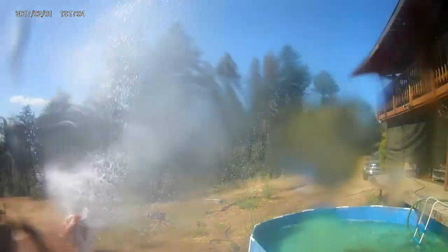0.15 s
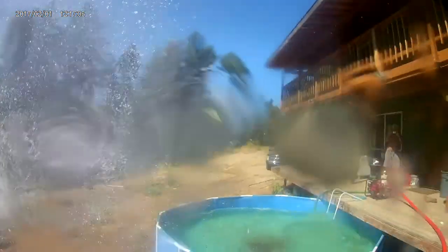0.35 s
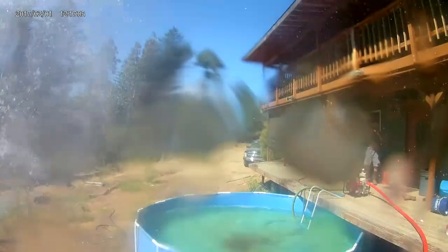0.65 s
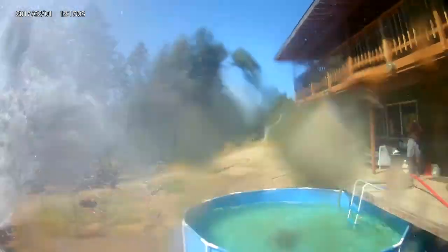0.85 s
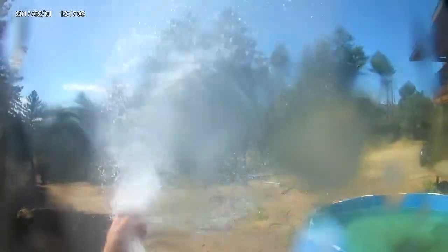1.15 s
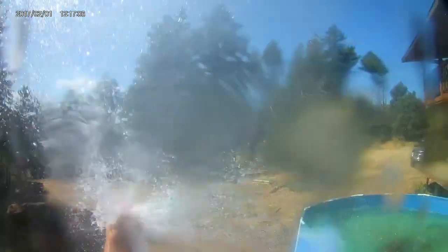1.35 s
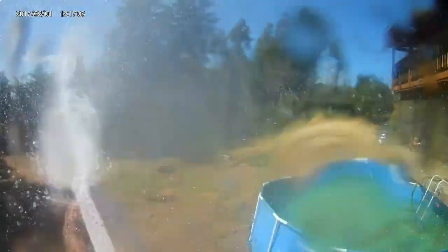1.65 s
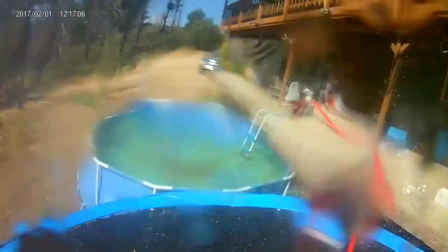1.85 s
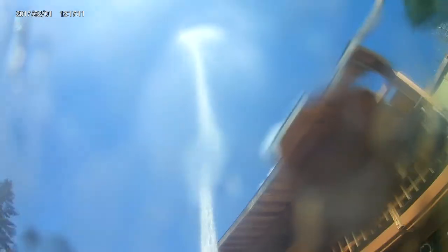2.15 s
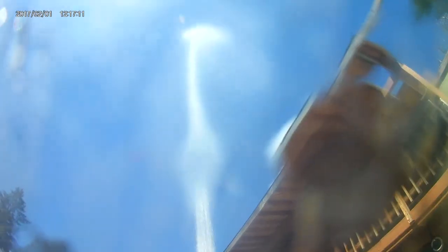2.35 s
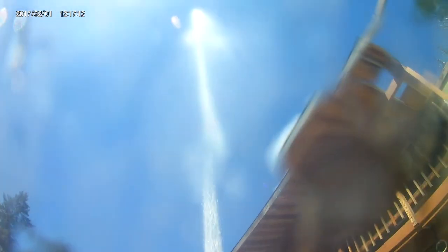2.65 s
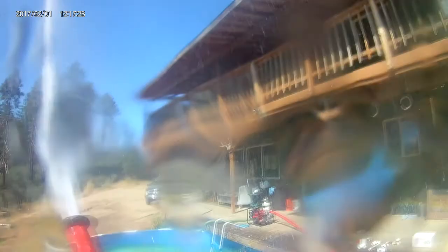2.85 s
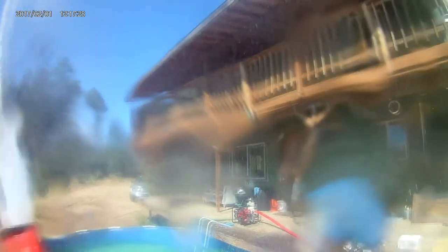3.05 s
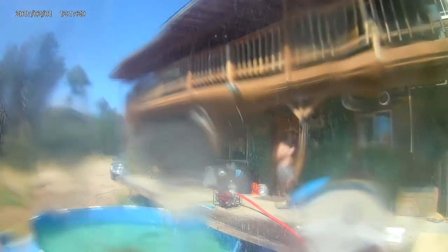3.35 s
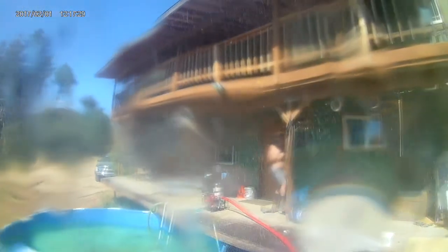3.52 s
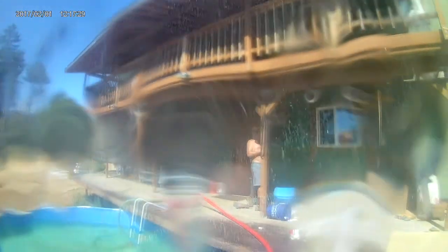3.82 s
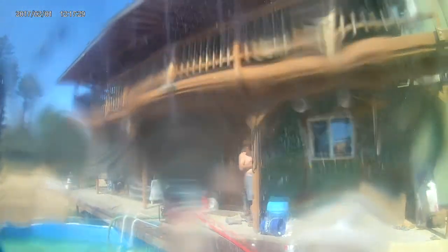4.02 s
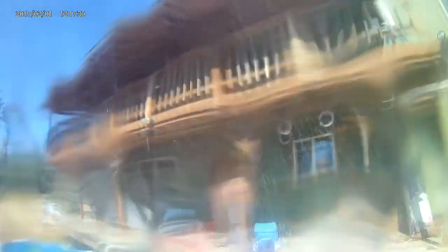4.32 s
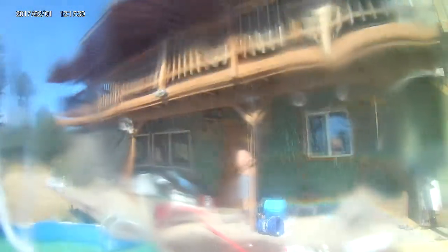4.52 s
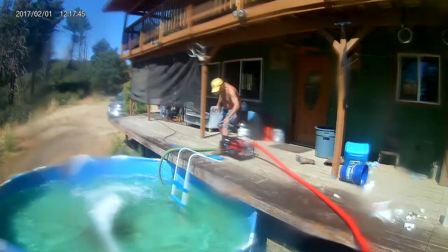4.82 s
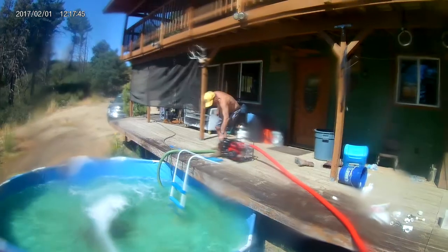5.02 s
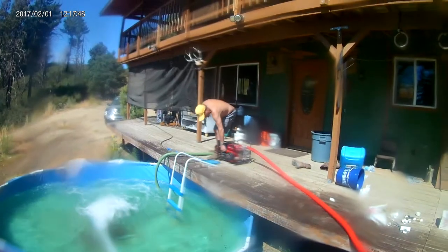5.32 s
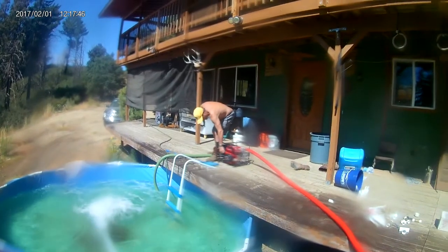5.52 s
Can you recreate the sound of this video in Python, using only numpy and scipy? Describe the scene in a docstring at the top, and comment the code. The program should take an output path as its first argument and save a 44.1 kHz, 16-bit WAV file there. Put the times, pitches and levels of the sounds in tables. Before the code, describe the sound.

A wearable-type microphone in a hard casing catches close hose spray over a constant pump engine across the yard. The hiss flares and spatters, then drops through abrupt cuts with low wind rumble. Falling water then pelts the casing with dense, hollow knocks and clicks, far louder than everything else. The last cut leaves a rattling engine and a jet churning the pool.

```python
"""Pump and hose in a yard

A small petrol pump drones steadily across the yard: harmonics of its firing cycle, and knocks that ring.
Near the microphone a hose jet, made of flickering coloured noise, hisses, narrows and falls back as heavy drops.
They drum on the hard shell carrying the microphone, a set of struck modes; then the jet plunges into a pool.
Wind rumbles lumpily underneath. The listening place changes abruptly four times."""
import sys
import numpy as np
from scipy import signal
from scipy.fft import rfft, irfft, next_fast_len
from scipy.io import wavfile

SR = 44100
rng = np.random.default_rng(int(sys.argv[2]) if len(sys.argv) > 2 else 0)


def wav_out(sig):
    """Save sig, one row per channel (or a flat mono array), as 16-bit PCM at SR to the path in sys.argv[1]."""
    wavfile.write(sys.argv[1], SR, np.round(np.clip(np.atleast_2d(sig).T, -1, 1) * 32767).astype(np.int16))


N = 250488


def from_db(db):
    """Gain of a level in dB."""
    return 10 ** (np.asarray(db) / 20)


def rms_one(x):
    """Scale to rms 1."""
    return x / np.sqrt(np.mean(x ** 2) + 1e-20)


def in_time(rows, outside=None):
    """Columns of a table joined by straight lines, one value a sample; the first column is t/s."""
    t, *columns = np.transpose(rows)
    return [np.interp(np.arange(N) / SR, t, column, outside, outside) for column in columns]


def drift(rate_hz):
    """Slow chance: noise through a double one-pole low-pass; spread 1."""
    r = np.exp(-2 * np.pi * rate_hz / SR)
    noise = rng.standard_normal(N + SR)     # the first second lets the filter settle
    return rms_one(signal.lfilter([1], [1, -2 * r, r * r], noise)[SR:])


def band_pass(x, order, edges_hz):
    """Keep the range between two frequencies."""
    return signal.sosfilt(signal.butter(order, edges_hz, "band", fs=SR, output="sos"), x)


def coloured(x, spectrum):
    """Give a white signal a spectrum, straight in dB over log frequency; rms 1."""
    size = next_fast_len(N)
    hz, level_db = np.transpose(spectrum)
    log_hz = np.log(np.arange(1, size // 2 + 2) * SR / size)
    gain = from_db(np.interp(log_hz, np.log(hz), level_db, -80, -80))
    return rms_one(irfft(rfft(x, size) * gain, size)[:N])


def ring(clicks, hz, t60):
    """A unit click sets a sine of starting height 1 ringing; it falls 60 dB in t60 seconds."""
    r, w = from_db(-60 / (t60 * SR)), 2 * np.pi * hz / SR
    return signal.lfilter([0, np.sin(w)], [1, -2 * r * np.cos(w), r * r], clicks + 1e-18)


# When the listening place changes: t/s
CHANGES_S = [1.72, 2.11, 2.88, 4.846]
# The five listening places, one a row: engine gain level/dB, rush level/dB, fine hiss level/dB,
# wind rumble level/dB, share of the poolside [0-1]
PLACES = [(4, -43.5, -47.5, -54, 0.17), (4, -50, -57, -47, 0.54), (3, -57.5, -59, -62, 0.32),
          (5, -39, -50.5, -56.5, 0.8), (3.5, -54, -107, -63, 0.98)]
CHANGE_S = .012     # length of each change


def places():
    """Columns of the places table, each gliding quickly to the next row at a change."""
    t = np.repeat(CHANGES_S, 2) + np.tile([-CHANGE_S / 2, CHANGE_S / 2], len(CHANGES_S))
    return in_time(np.column_stack([t, np.repeat(PLACES, 2, axis=0)[1:-1]]))


# Multiples 1, 2, 3 .. of the firing cycle, before the place's gain and the drift:
# peak level/dB in the yard, peak level/dB at the poolside
ORDERS = [(-74, -65), (-70, -64), (-86, -74), (-76, -70), (-66, -62), (-69, -59), (-68, -62), (-62, -68),
          (-66, -63), (-63, -59), (-76, -63), (-87, -61), (-65, -60), (-73, -63), (-75, -64), (-61, -57),
          (-61, -59), (-67, -65), (-72, -67), (-61, -62), (-64, -69), (-80, -67), (-73, -63), (-66, -62)]


def engine_orders(turns, pool):
    """Sines at multiples of the firing cycle, each wavering in level on its own."""
    lines = 0
    for k, (yard_db, pool_db) in enumerate(ORDERS, start=1):
        lag = rng.random()      # echoes off the yard scatter the orders over the cycle
        level_db = yard_db + pool ** 8 * (pool_db - yard_db) + 2.0 * drift(4.7)
        lines = lines + from_db(level_db) * np.cos(2 * np.pi * (k * turns - lag))
    return lines


# Upper engine resonances: f/Hz, width f/Hz, relative level/dB
CLATTER = [(1080, 320, -5), (1255, 67, -7.5)]


def engine_clatter(turns):
    """One knock a cycle, smeared by echoes off walls and deck, rings in the upper resonances; rms 1."""
    knocks = np.diff(np.floor(turns), prepend=0) * from_db(3.0 * drift(37))
    after_s = np.arange(0, .12, 1 / SR)
    echoes = rng.standard_normal(len(after_s)) * np.exp(-after_s / .05)
    knocks = signal.fftconvolve(knocks, echoes)[:N]
    clatter = 0
    for hz, width_hz, level_db in CLATTER:
        clatter = clatter + from_db(level_db) * ring(knocks, hz, np.log(1000) / (np.pi * width_hz))
    return rms_one(clatter)


CYCLES_PER_S = 31.51    # mean firing rate


def engine():
    """The pump across the yard: firing orders and clatter share one almost steady rotation."""
    gain_db, *_, pool = places()
    turns = np.cumsum(CYCLES_PER_S * (1 + .0006 * drift(2.5))) / SR
    clatter_gain = from_db(-55.0 + 5.9 * pool)
    return from_db(gain_db) * (engine_orders(turns, pool) + clatter_gain * engine_clatter(turns))


def patchy(x, edges_hz, patchy_db):
    """Let ranges of a noise swell and sink on their own as the fan of water changes shape."""
    out = x
    for pair in zip(edges_hz, edges_hz[1:]):
        out = out + (from_db(patchy_db * drift(2.8)) - 1) * band_pass(x, 2, pair)
    return out


# Lower jet noise: f/Hz, relative level/dB per Hz
RUSH = [(120, -46), (400, -18), (1050, -12.5), (1290, -3), (1500, -4.5), (1900, -15), (2350, -8.5),
        (2750, -24.5)]
# Upper jet noise: f/Hz, relative level/dB per Hz
HISS = [(2700, -22), (3550, 2), (4000, -6.5), (4290, -4.5), (4900, -20), (5270, -9.5), (5600, -20),
        (6950, -14), (8500, -26.5), (9500, -22), (12300, -27)]


def jet(rush_db, hiss_db):
    """Hose spray near the microphone: jet noise in two ranges that flicker partly together."""
    together = drift(25)
    rush = coloured(rng.standard_normal(N) * from_db(together + drift(140)), RUSH)
    hiss = coloured(rng.standard_normal(N) * from_db(together + 0.23 * drift(100)), HISS)
    rush = patchy(rush, [1100, 1900, 2600], 2.0)
    hiss = patchy(hiss, [3000, 4000, 7000, 11500], 1.5)
    return from_db(rush_db) * rush + from_db(hiss_db) * hiss


# The jet plunging into the pool: f/Hz, relative level/dB per Hz
PLUNGE = [(100, -35), (700, -11.5), (1000, -24), (1280, 4), (1420, -19), (1800, -5.5), (2000, -22),
          (2750, -28), (3250, -2.5), (3550, -14.5), (7500, -28.5), (12300, -36.5)]
PLUNGE_DB = -46     # at full share of the poolside


def plunge(pool):
    """Flickering coloured noise of the jet entering the pool, stronger towards the poolside."""
    return from_db(PLUNGE_DB) * pool * coloured(rng.standard_normal(N) * from_db(drift(68)), PLUNGE)


# Wind at the microphone: f/Hz, relative level/dB per Hz
RUMBLE = [(15, 6), (70, 6.5), (100, -12), (160, 6.5), (300, -24)]


def wind(rumble_db):
    """Low coloured noise whose level wanders in lumps."""
    return from_db(rumble_db) * coloured(rng.standard_normal(N) * from_db(2.5 * drift(10)), RUMBLE)


# The fan of water swings towards the listener in the first place; added gains:
# t/s, rush level/dB, hiss level/dB, rumble level/dB
FAN = [(0, -1.5, 5, 5), (.25, 2, 5, 0), (.9, 0, 4, 0), (1.03, 0, 9, -1.5), (1.45, 6, 7.5, 1),
       (1.58, 4, 7, 7), (1.71, 0, 3.5, 10)]


def water():
    """Jet, plunge and wind rumble, at the levels of each place and of the swinging fan."""
    _, *levels_db, pool = places()
    rush_db, hiss_db, rumble_db = np.add(levels_db, in_time(FAN, outside=0))
    return jet(rush_db, hiss_db) + plunge(pool) + wind(rumble_db)


# Heavy drops on the shell, before the final filters:
# t/s, deep ring peak level/dB, middle rings peak level/dB, upper rings peak level/dB
DROPS = [(0.164, -33, -32, -50), (0.407, -31.5, -39, -48), (1.356, -56, -25, -39), (1.406, -51, -22.5, -45),
         (1.424, -47, -24, -55), (1.472, -21, -31, -59), (1.48, -37, -18.5, -21), (1.542, -59, -23, -42),
         (1.602, -35, -19.5, -40), (1.916, -35, -33, -41.5), (2.884, -58, -3, -16.5), (2.897, -7, -4, -23),
         (2.923, -37, -15.5, -30), (3.041, -45, -26, -26), (3.054, -15.5, -23, -25),
         (3.059, -35, -10.5, -23.5), (3.101, -21, -22.5, -32), (3.147, -24, -21.5, -35),
         (3.186, -29, -18.5, -52), (3.203, -22, -15, -20), (3.254, -41, -21.5, -49), (3.273, -24, -15, -40),
         (3.302, -13.5, -14, -19), (3.324, -17, -16, -36), (3.354, -16, -13.5, -25), (3.374, -18, -17, -21),
         (3.418, -11, -12, -32), (3.454, -15, -13.5, -38), (3.481, -19, -14.5, -29),
         (3.541, -52, -16.5, -25.5), (3.566, -41, -12, -35), (3.596, -10.5, -14.5, -35),
         (3.618, -18, -15.5, -23), (3.632, -17.5, -14, -25), (3.64, -20, -28, -39),
         (3.648, -31, -12.5, -36), (3.702, -26, -17.5, -43), (3.715, -39, -21, -47),
         (3.735, -16, -12.5, -32), (3.748, -14, -13, -27), (3.776, -20.5, -28, -42), (3.796, -42, -25, -42),
         (3.805, -35, -35, -44), (3.831, -42, -18.5, -23), (3.857, -17, -20, -33), (3.872, -17, -23, -28),
         (3.909, -29, -11, -23.5), (3.933, -17.5, -8.5, -24), (3.968, -22, -12.5, -24.5),
         (3.982, -19, -9.5, -44), (4.008, -35, -37, -40), (4.035, -20, -28, -43), (4.077, -22, -15.5, -47),
         (4.125, -30, -18, -28), (4.128, -30, -10, -25), (4.145, -17, -13, -29), (4.2, -22.5, -18, -30),
         (4.286, -17.5, -16, -33), (4.349, -21, -17.5, -33), (4.419, -22, -10.5, -38),
         (4.434, -13.5, -35, -29), (4.556, -22.5, -24.5, -41), (4.639, -21, -26, -54),
         (4.69, -44, -20, -49), (4.71, -21, -26, -46), (4.735, -19, -17.5, -38), (4.804, -23, -26, -36),
         (4.838, -17.5, -17.5, -31)]
# Drops that barely stir the deep ring favour the higher middle rings: dB per octave for each dB
EDGE_TILT = .25


def heavy_drops(mode_hz, mode_db, group):
    """Blows on each mode: a drop shares its force out in its own way and lands as a short splat."""
    t, *peaks_db = np.transpose(DROPS)
    at = np.round(t * SR).astype(int)
    # only the drops after the second change are tilted
    weak_deep_db = np.minimum(peaks_db[0] - peaks_db[1], 0) * (t > CHANGES_S[1])
    tilt_db = -EDGE_TILT * weak_deep_db[:, None] * np.log2(mode_hz / 1300) * (group == 1)
    shares = from_db(mode_db + tilt_db + 2.5 * rng.standard_normal((len(at), len(mode_hz))))
    splat = np.exp(-np.arange(round(.012 * SR)) / (.0025 * SR))
    boost_db = [4.0, 3.5, 1.5]      # the rings of a group never peak together
    blows = []
    for k, g in enumerate(group):
        hits = np.zeros(N)
        share = shares[:, k] / shares[:, group == g].sum(axis=1)
        hits[at] = -from_db(peaks_db[g] + boost_db[g]) * share
        spread = signal.fftconvolve(hits, splat)[:N] * rng.standard_normal(N)
        sharp, smeared = (.45, .45) if g == 2 else (1, .07)
        blows.append(sharp * hits + smeared * spread)
    return blows


BURST_DB, BURST_S = -35, 0.01   # offset from the upper ring peak; decay time constant


def spray_bursts():
    """Envelope of the fine spray into which each big drop breaks, dying away."""
    t, *_, upper_db = np.transpose(DROPS)
    bursts = np.zeros(N)
    bursts[np.round(t * SR).astype(int)] = from_db(BURST_DB + upper_db)
    return signal.lfilter([1], [1, -np.exp(-1 / (BURST_S * SR))], bursts)


def shower(per_s, spread_db, clumps):
    """Random blows in clumps, most small and a few larger; rms 1."""
    sizes = from_db(spread_db * np.minimum(rng.exponential(1, N), 3.5)) * rng.choice([-1, 1], N)
    return rms_one(sizes * (rng.random(N) < per_s * clumps / SR))


# Dull bumps against the shell, before softening and filtering: t/s, peak level/dB
THUMPS = [(0.465, -27.5), (1.655, -23), (1.768, -19), (2.884, -7.5)]
BOOM_HZ, BOOM_T60_S = 180, .1
BOOM_DB = -39.5     # stirring by the shower, before the band filter


def boom(on, clumps):
    """The deepest mode of the shell, stirred by the shower and by single bumps."""
    bumps = np.zeros(N)
    for t, peak_db in THUMPS:
        bumps[round(t * SR)] = from_db(peak_db)
    soft = signal.fftconvolve(bumps, np.hanning(round(0.0064 * SR)) / (0.0053 * SR))[:N]
    stirred = rms_one(ring(shower(300, 1.3, clumps), BOOM_HZ, BOOM_T60_S))
    both = from_db(BOOM_DB) * on * stirred + ring(soft, BOOM_HZ, BOOM_T60_S)
    return band_pass(both, 2, [100, 330])


PATTER_DB, THIN_DB = -58.5, -19     # blow level in the hold; change from it at either end
BUILD_S, THIN_S = 0.93, 0.53        # length of the rise and of the fall


def patter_level():
    """Level of the small drops in dB: a rise, a hold and a fall while the shower lasts, silence outside."""
    start, end = CHANGES_S[-2:]
    thin_db = PATTER_DB + THIN_DB
    rows = [(start, thin_db), (start + BUILD_S, PATTER_DB), (end - THIN_S, PATTER_DB), (end, thin_db)]
    return in_time(rows, outside=-200)[0]


SPRAY_OFFSET_DB = -27.5     # added to 0.53 of the small drops' level


def small_drops(patter_db, on, clumps):
    """Blows of the small drops, and of the finest spray with the bursts of the big drops."""
    patter = from_db(patter_db) * shower(500, 3.8, clumps)
    spray_gain = from_db(SPRAY_OFFSET_DB + 0.53 * patter_db + 3.6 * drift(2.93)) * on
    spray = (spray_gain + spray_bursts()) * shower(900, 4.37, clumps)
    return patter, spray


# Modes of the hard shell: f/Hz, relative level/dB, t60 t/s
SHELL = [(779, 4, 0.055), (930, 6, 0.006), (1275, 8, 0.02), (1763, 1, 0.036), (2355, -3, 0.015),
         (3620, 4, 0.007), (4024, 5, 0.0085), (4550, -1, 0.005), (5400, 0, 0.005), (6830, -11, 0.008),
         (9700, -19, 0.006)]


def shell():
    """The shell carrying the microphone: heavy and small drops strike its modes, over the deep boom."""
    mode_hz, mode_db, _ = np.transpose(SHELL)
    group = np.searchsorted([950, 3000], mode_hz)   # 0 deep, 1 middle, 2 upper
    patter_db = patter_level()
    on = patter_db > -100
    clumps = from_db(4.0 * drift(22))
    patter, spray = small_drops(patter_db, on, clumps)
    heavy = heavy_drops(mode_hz, mode_db, group)
    out = 0
    for k, (hz, level_db, t60) in enumerate(SHELL):
        landing = np.repeat(rng.standard_normal(N // 150 + 1), 150)[:N]     # where each small drop lands
        small = from_db(level_db + 3.5 * landing) * (spray if group[k] == 2 else patter)
        out = out + ring(heavy[k] + small, hz, t60)
    out = band_pass(out, 3, [600, 10800]) + boom(on, clumps)
    return out * np.clip((CHANGES_S[-1] - np.arange(N) / SR) / 0.0019, 0, 1)    # silent from the last change


# A brief wet whistle among the drops, a single row:
# start t/s, end t/s, first f/Hz, last f/Hz, level/dB before the flutter
WHISTLE = (4.16, 4.258, 1100, 1245, -24)


def whistle():
    """A fluttering sine that rises, then holds its pitch, while its level swells and dies away."""
    start, end, first_hz, last_hz, peak_db = WHISTLE
    part = np.clip((np.arange(N) / SR - start) / (end - start), 0, 1)
    hz = first_hz + np.minimum(2 * part, 1) * (last_hz - first_hz)
    tone = np.sin(2 * np.pi * np.cumsum(hz) / SR)
    swell = np.sqrt(np.abs(np.sin(np.pi * part ** 2))) * (part < 1)
    return from_db(peak_db + 2.0 * drift(64)) * swell * tone


DIP_S = 0.0073  # fall, and again rise, of the dip


def scene():
    """Engine and water, dipping briefly at the last three changes, with shell and whistle; one channel."""
    away_s = np.abs(np.arange(N) / SR - np.array(CHANGES_S[1:])[:, None]).min(axis=0)
    dip = np.clip(away_s / DIP_S, 0, 1)
    return ((engine() + water()) * dip + shell() + whistle())[None, :]


PORT_DIP_HZ, CUTOFF_HZ = 7950, 12080


def record(dry):
    """The microphone port weakens a narrow range; the deepest bass and the top are cut."""
    port = 0.053 * dry + 0.68 * signal.lfilter(*signal.iirnotch(PORT_DIP_HZ, 4.0, fs=SR), dry)
    low_cut = signal.sosfilt(signal.butter(2, 20, "high", fs=SR, output="sos"), port)
    return signal.sosfilt(signal.ellip(12, .5, 80, CUTOFF_HZ, fs=SR, output="sos"), low_cut)


dry = scene()
out = record(dry)
wav_out(out)
```